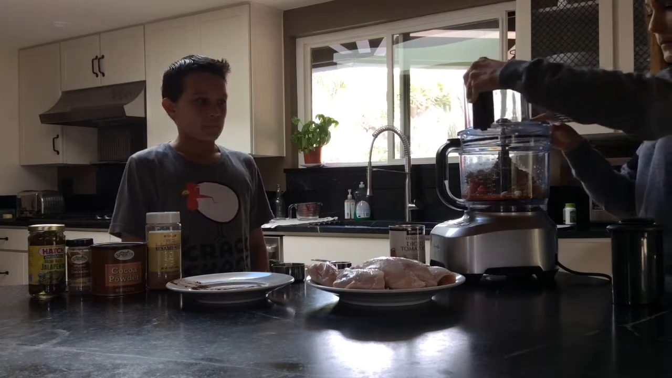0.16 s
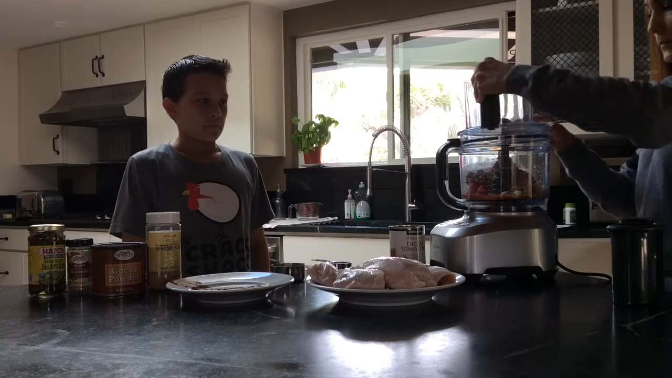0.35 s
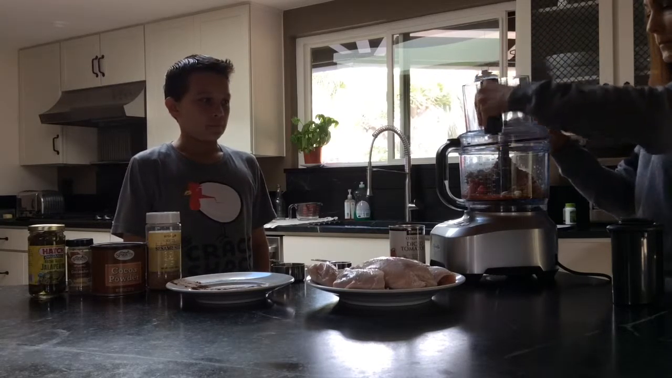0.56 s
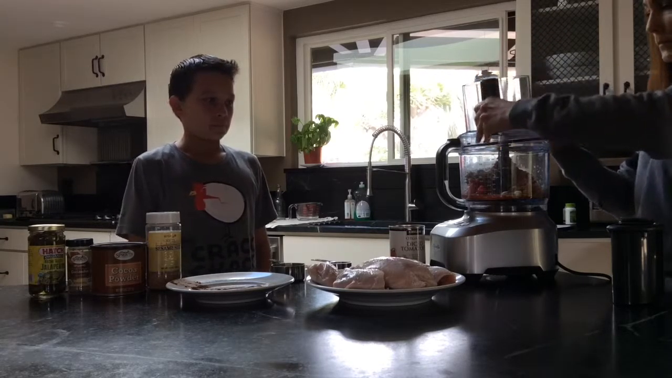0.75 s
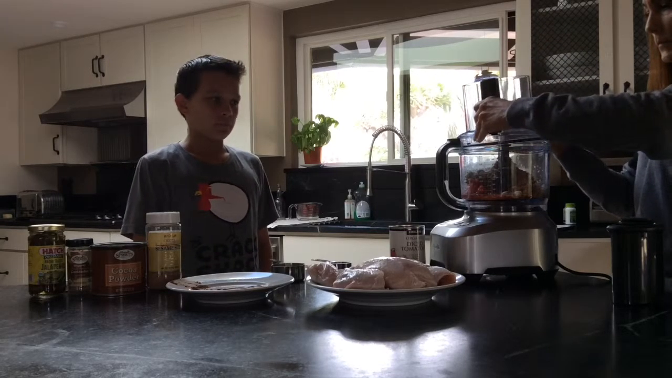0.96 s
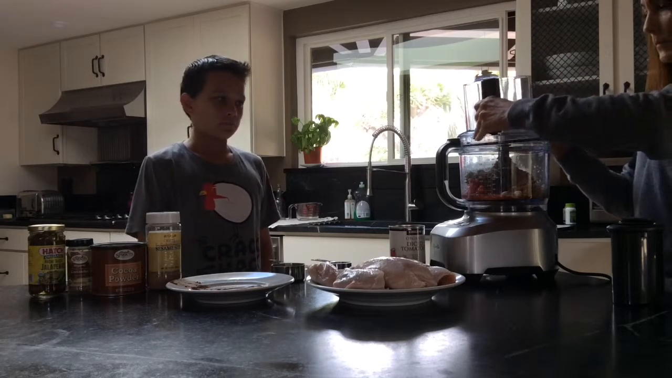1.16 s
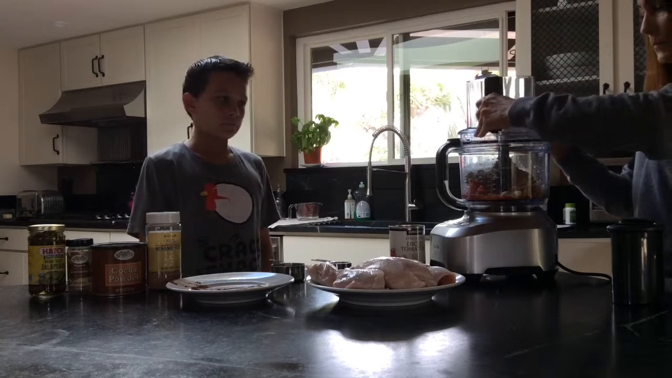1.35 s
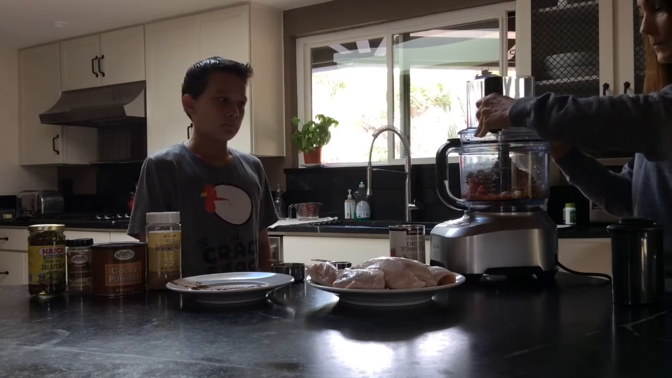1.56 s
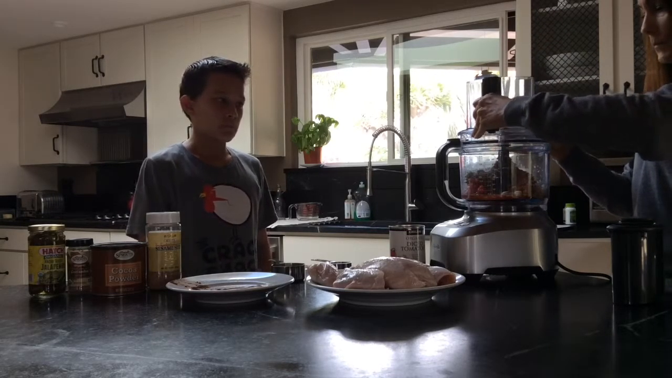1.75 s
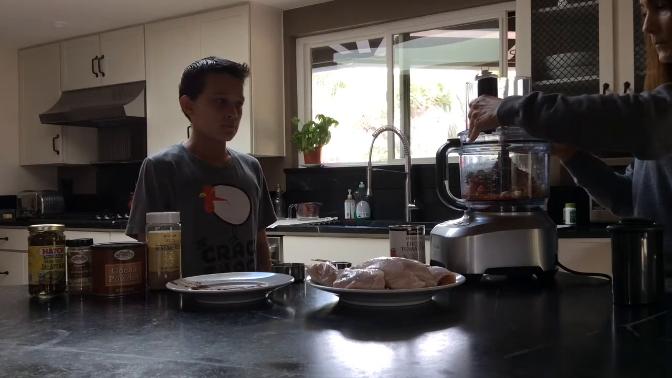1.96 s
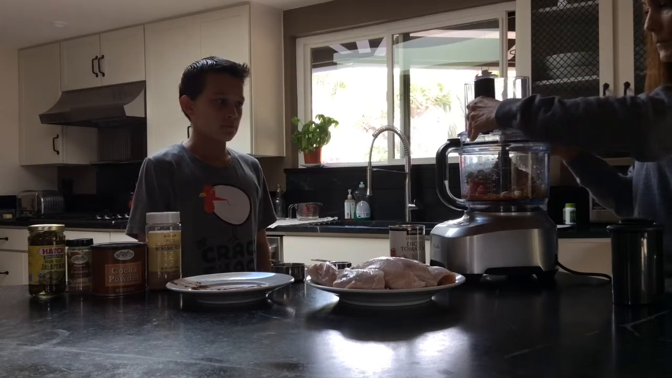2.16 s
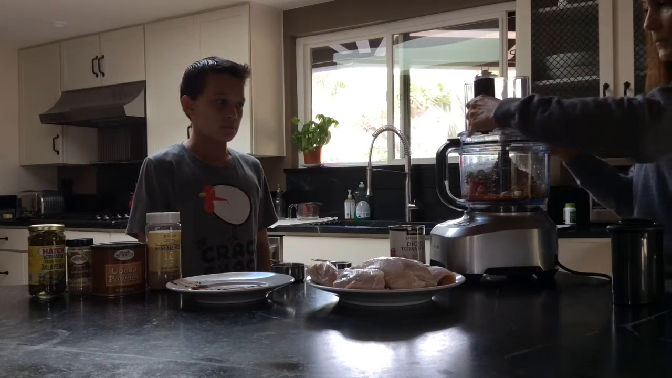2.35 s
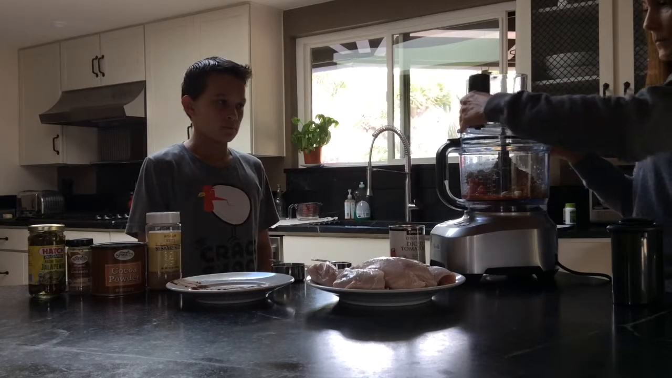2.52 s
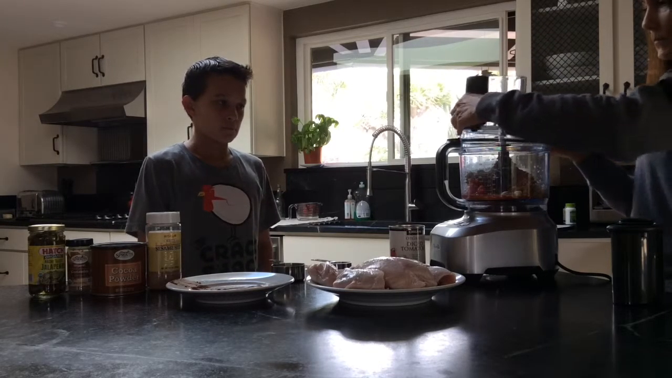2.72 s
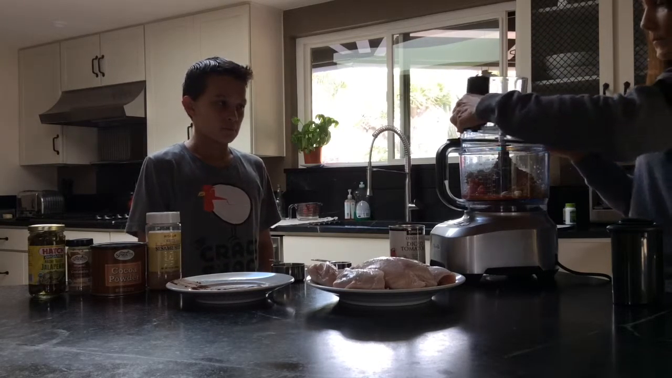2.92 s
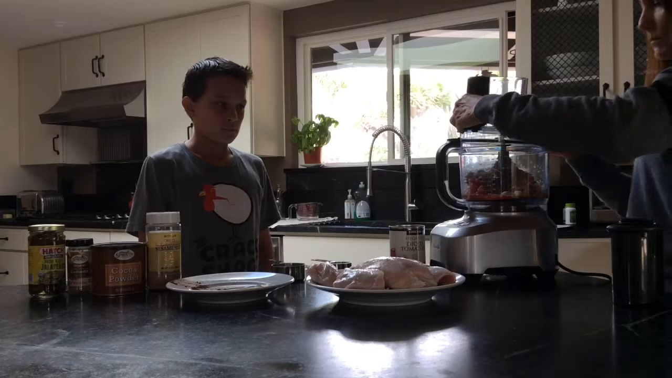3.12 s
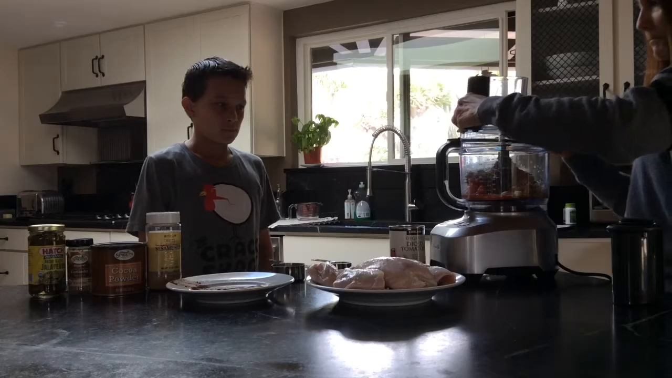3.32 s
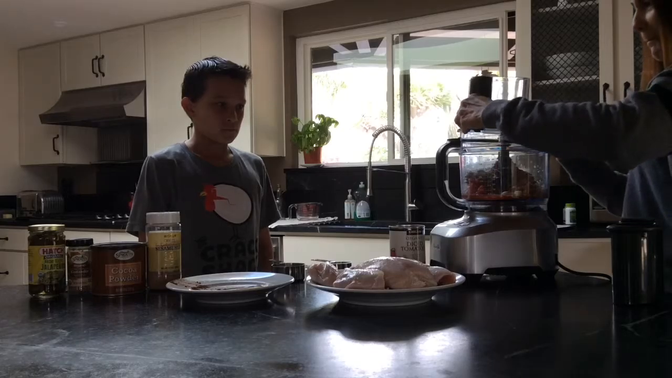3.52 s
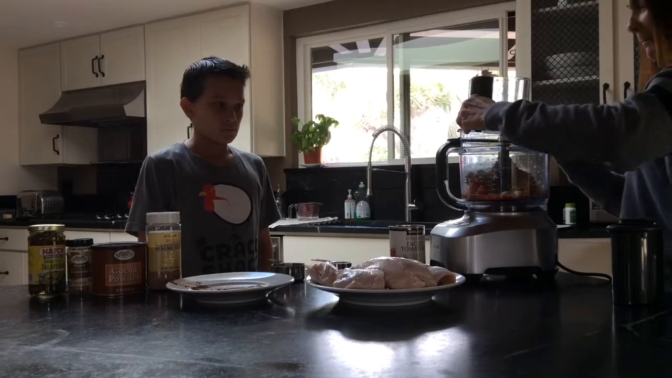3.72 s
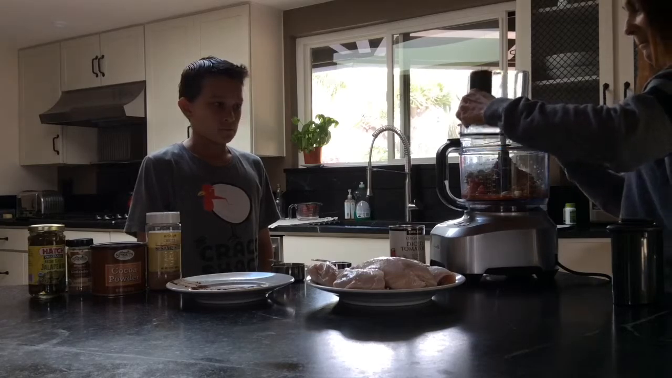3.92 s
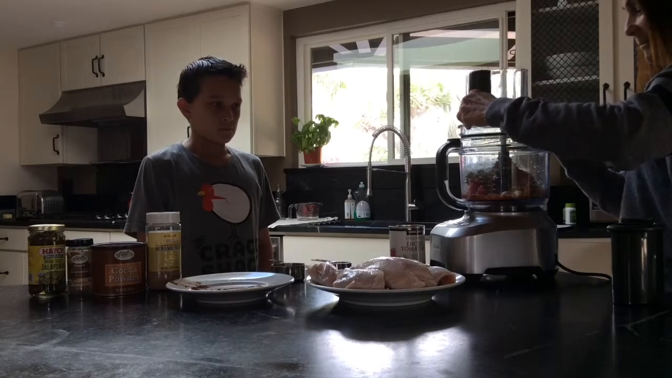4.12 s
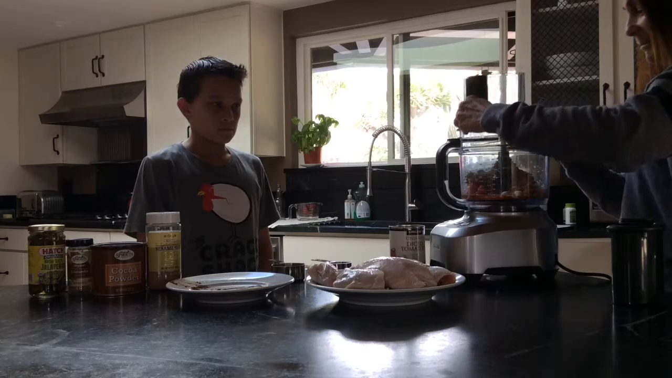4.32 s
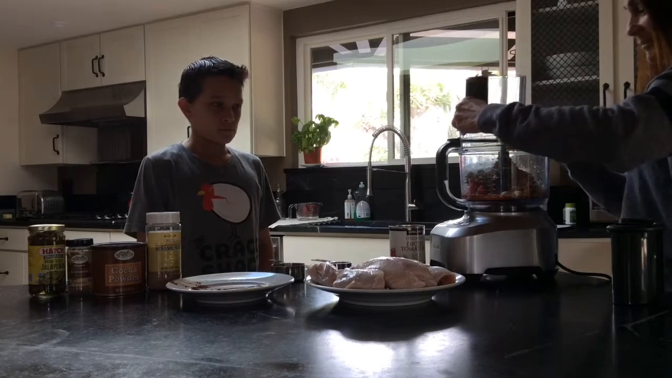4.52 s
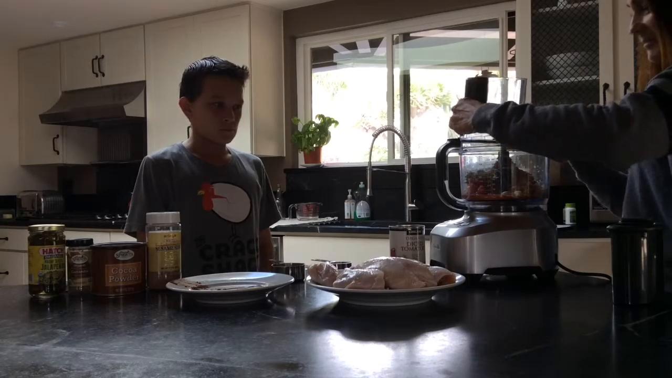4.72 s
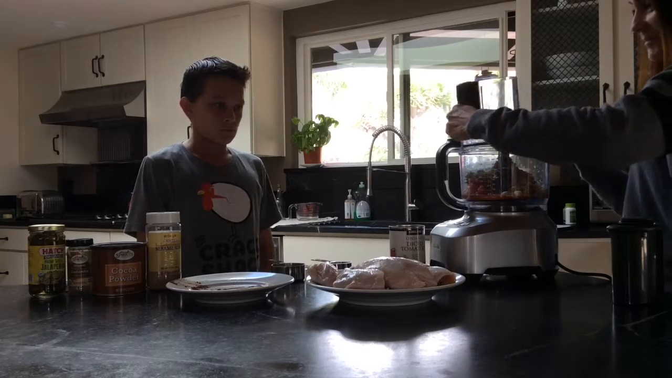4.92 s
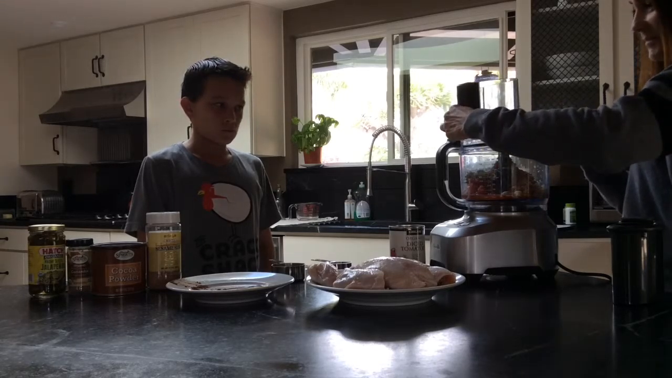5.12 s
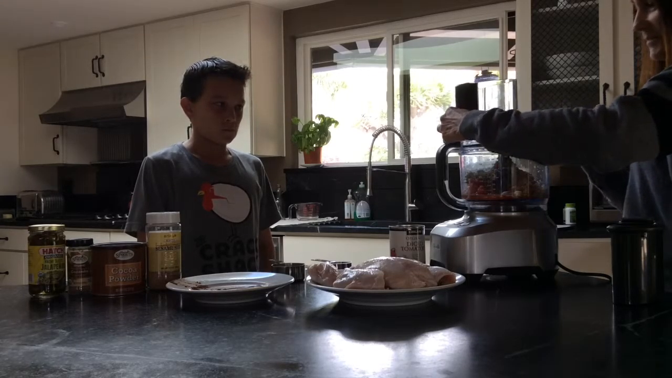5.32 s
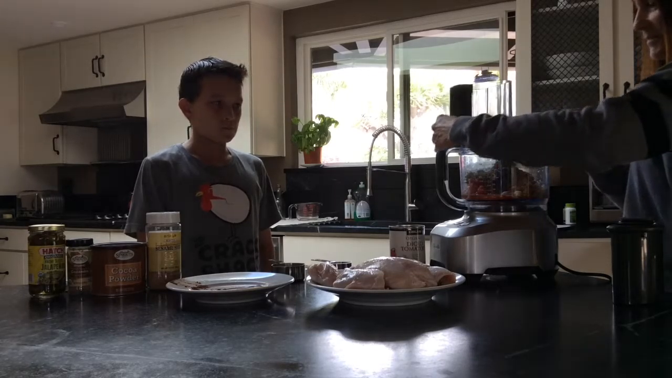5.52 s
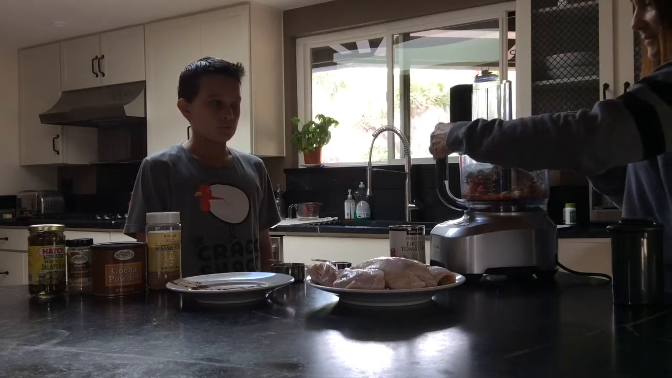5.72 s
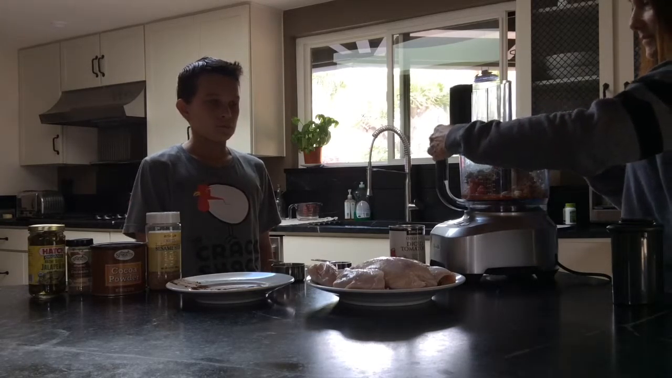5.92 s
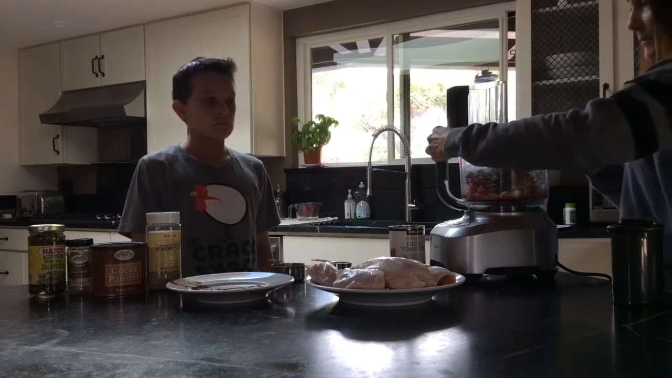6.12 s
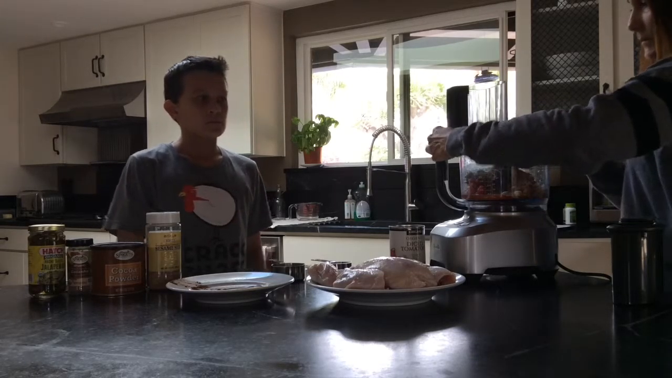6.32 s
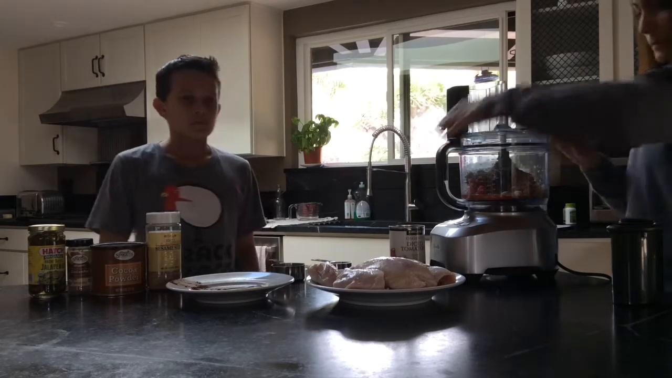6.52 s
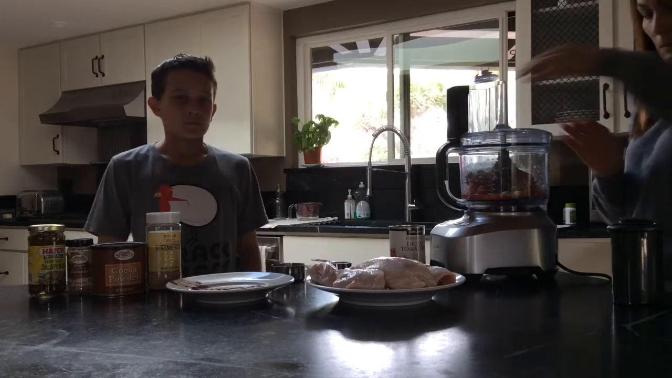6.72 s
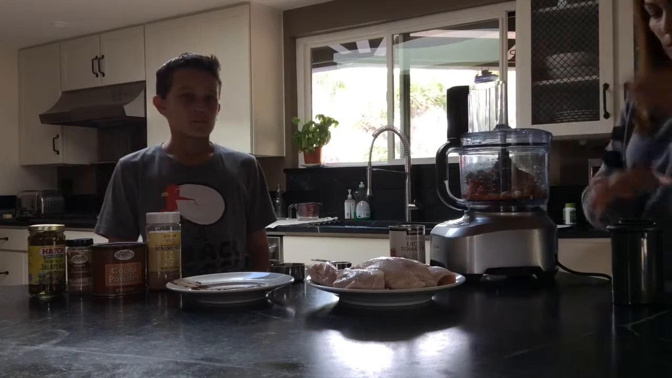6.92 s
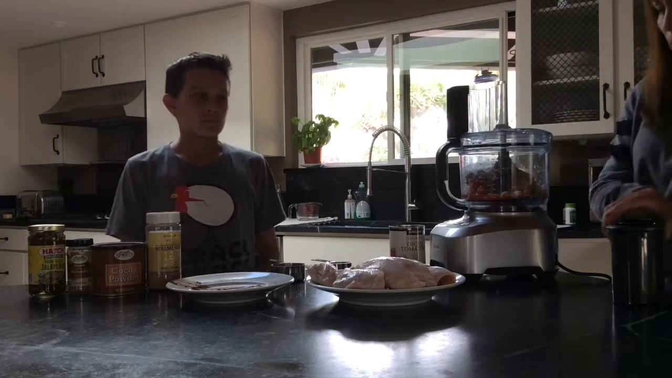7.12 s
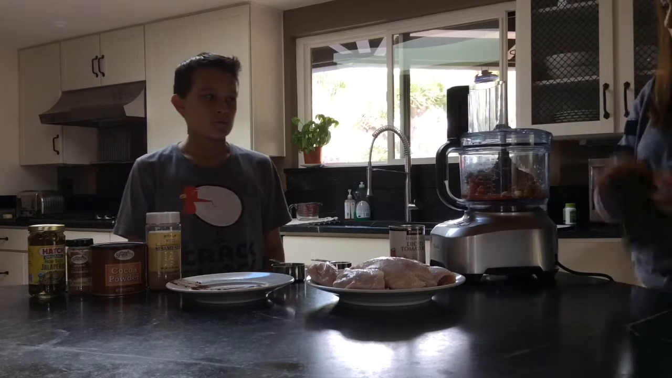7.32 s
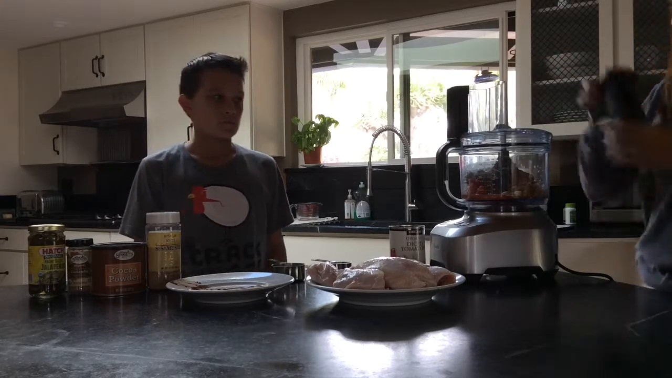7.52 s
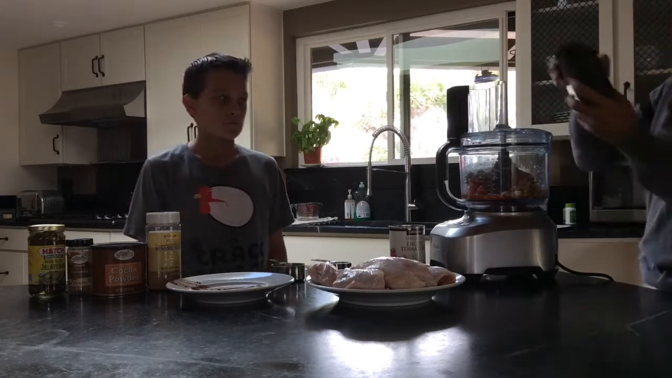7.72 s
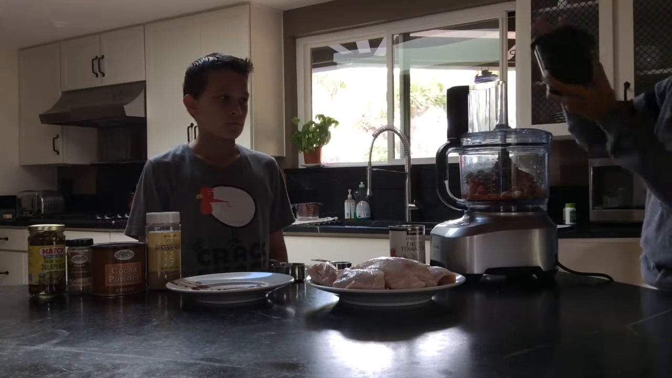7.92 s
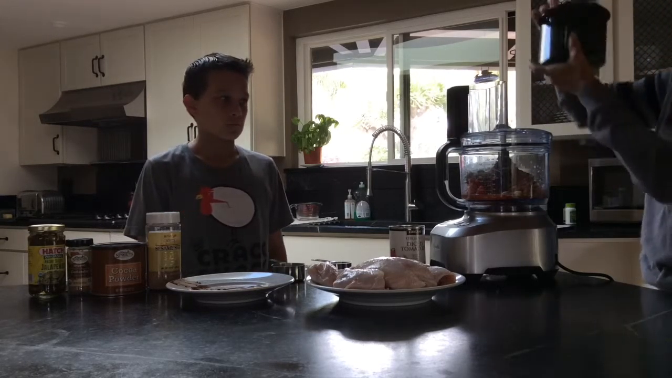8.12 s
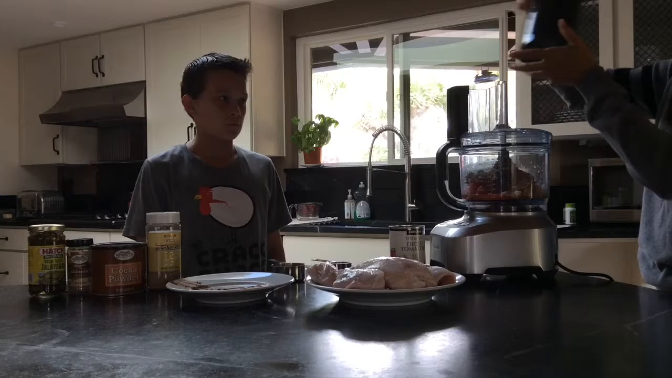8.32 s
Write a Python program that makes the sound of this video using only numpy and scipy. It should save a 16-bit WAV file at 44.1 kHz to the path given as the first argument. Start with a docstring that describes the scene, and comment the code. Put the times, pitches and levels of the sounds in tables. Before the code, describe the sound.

In a quiet kitchen, a food processor's plastic lid is fitted onto its bowl. A sharp clack comes first, then a click with a low thump and scattered light taps. The knocks build into a quick hollow rattle and end in a crisp locking snap. Sleeves rustle faintly and a cup is knocked once. Everything is at arm's length, with a short echo and a low fridge hum.

```python
"""Kitchen counter, at arm's length: a food processor's plastic lid and pusher slide, seat and lock.
Each contact cracks, thumps the air in the bowl and rings the lid's modes; the base thumps once, low.
Then sleeves rustle, and a cup is knocked and lifted.
Cabinets and hard walls echo every click. A fridge hums low over soft room noise."""
import sys
import numpy as np
from scipy import signal
from scipy.fft import rfft, irfft, next_fast_len
from scipy.io import wavfile
from scipy.ndimage import uniform_filter1d

SR = 44100
rng = np.random.default_rng(int(sys.argv[2]) if len(sys.argv) > 2 else 0)


def dump(signal):
    """Clip the signal to [-1, 1] and save it as 16-bit WAV at the path in sys.argv[1]."""
    limited = np.clip(np.atleast_2d(signal).T, -1, 1)
    pcm = np.round(limited * 32767).astype(np.int16)
    wavfile.write(sys.argv[1], SR, pcm)


N = 373086
EVENT_N = 32768
EVENT_TIME_S = np.arange(EVENT_N) / SR

# fridge tones: pitch_hz, level_db
FRIDGE_TONES = [(41.5, -82), (59.1, -69), (80.6, -65), (160.5, -74), (180, -72.5)]
# hum envelope, dips near the end: time_s, gain_db
FRIDGE_ENVELOPE = [(0, 0), (7.1, 0.5), (7.6, -6.5), (8.4, -3)]
# room noise spectrum: freq_hz, relative_db
ROOM_SPECTRUM = [(20, -6), (45, -32.5), (75, -3.5), (100, -3), (120, -3.5), (165, 1), (220, -4.5),
                 (400, -9.5), (780, -16.5), (1000, -21.5), (2800, -27.5), (6800, -29), (8300, -25),
                 (15000, -36.5)]
# kitchen reverb: freq_hz, t60_s
ROOM_DECAY = [(100, 0.64), (300, 0.44), (1200, 0.57), (3500, 0.45), (8000, 0.44), (14000, 0.11)]
# counter and cabinet reflections: delay_s, gain
EARLY_ECHOES = [(.0013, 0.095), (.0045, 0.22), (.0083, 0.48), (0.0118, 0.27), (0.019, 0.35)]
# plastic slides and one low thump of the base (at 1.925 s):
# peak_s, width_s, level_db, centre_hz, bandwidth_oct
SLIDES_AND_BASE_THUMP = [(.032, 0.032, -60.5, 432, 0.55), (.62, 0.011, -60, 472, 3),
                         (1.925, 0.038, -49, 179, 2.5), (2.464, .022, -63, 323, 1.4),
                         (2.692, .018, -51, 294, 1.6), (4.034, 0.022, -69.5, 3160, 2.4),
                         (4.476, 0.0073, -66, 2000, 1.1), (6.19, 0.014, -58, 1060, 2.2)]
# lid and pusher contacts; hardness is treble slope, thump is re level, ring is re a usual hit:
# start_s, level_db, hardness_db_per_oct, thump_db, ring_db, hollow_hz, chatter_t60_s, snap_hz
LID_CONTACTS = [(0.657, -33, .1, 1.5, -2, 299.6, 0.022, 1720), (1.008, -71, -0.5, 9, 1.5, 267, .012, 1660),
                (1.289, -67.5, 0.3, 2, 1, 263, 0.025, 2210), (1.793, -69.5, -2.3, 7, 1, 278, .03, 1590),
                (1.8935, -41, 1.3, -7, -3, 457, 0.028, 1720), (2.491, -60, 1.6, 9, 0, 274, 0.022, 1730),
                (2.708, -59.5, 3, 16, 4.5, 329, 0.023, 1940), (2.722, -50.5, -3.5, 8, -3.5, 282, 0.06, 980),
                (2.911, -69, 3.5, -10, -15, 634, 0.018, 5520), (2.998, -69, 2, 1, -1, 270, .016, 1980),
                (3.235, -71, -1.5, 2.5, -4, 238, 0.027, 750), (3.602, -69.5, -5, 11.5, 9, 272, 0.019, 1200),
                (4.06, -60.5, 4.5, 2.5, 2.5, 355, 0.065, 1250),
                (4.448, -64.5, 1.9, -4, 0, 312, 0.044, 1820),
                (4.482, -46.5, -2.6, 12.5, -3, 316, 0.064, 427), (4.81, -63, -5, 10, 1, 273, 0.066, 770),
                (4.959, -52.5, 2.5, 7, 3, 278, 0.11, 1790),
                (5.0205, -46.5, 2.5, -8.5, 6.5, 270, 0.011, 1190),
                (5.218, -56, -1.5, 1.5, -2.5, 293, .11, 900), (5.25, -69.5, 5.5, 8, -6.5, 330, .03, 860),
                (5.433, -64.5, -3, 9, -4.5, 332, 0.092, 716), (5.511, -52.5, -4, 7, 1.5, 210, 0.045, 830),
                (5.556, -45, -3.5, 4, -2, 223, 0.06, 520), (5.564, -36.5, -0.9, 6.5, 1.5, 226.5, 0.02, 790),
                (5.587, -46, 0.5, 11.5, 2, 229, .079, 1240), (5.612, -41.5, -1.5, 7, 1, 236, 0.075, 1220),
                (6.197, -61, 2, 2, 3, 360, 0.024, 1700), (6.2403, -36.5, 3, -7.5, -2.5, 774, 0.0048, 5930),
                (6.2503, -43.5, -2, -3, 1.5, 362, 0.037, 520)]
# lid, bowl and base ringing in the room: pitch_hz, relative_db, t60_s
LID_RESONANCES = [(90.4, 1.5, 0.9), (239.7, 0.5, 0.69), (276.3, 12, 0.37), (328, 3, 0.53), (582, 2, 0.19),
                  (620, -5.5, 0.1), (782, 7, 0.32), (856, -6.5, 0.65), (978, -1.5, 0.43), (1155, 4, 0.41),
                  (1186, 2.5, 0.49), (1239, -3.5, 0.63), (1255, 2.5, 0.54), (1372, -24, 0.75),
                  (1530, -22, 0.23), (1798, -0.5, 0.2), (2163, 18.5, 0.05), (3140, 1, 0.3), (3460, 5, 0.31),
                  (4760, 18, 0.097), (5840, -20, 0.39), (5500, 2, .24), (7900, 7.5, 0.4), (7890, 2.5, 0.31)]
# usual lid hit in the knock, clack, click and tick bands: offset_db
LID_BANDS_DB = [2.1, 0.5, -5, -14]
# bounds of the thud, knock, clack, click and tick bands: edge_hz
BAND_EDGES_HZ = [150, 400, 1000, 2400, 6500, 15000]
# shell colour, on all contacts: freq_hz, relative_db
SHELL_SPECTRUM = [(40, -29), (90, -6), (170, -6.5), (290, -0.5), (420, 2.5), (750, -1), (1050, -1.5),
                  (1400, -6.5), (1750, -1), (2500, -2), (3400, 6.5), (4200, 4), (5600, 0.5), (8800, -8.5),
                  (15000, -26)]
# sleeve strokes: peak_s, level_db
SLEEVE_STROKES = [(6.72, -77), (7.58, -67), (7.753, -68), (7.868, -67), (8.259, -70), (8.353, -65.5)]
# cup contacts: columns as LID_CONTACTS
CUP_CONTACTS = [(7.3558, -47, 0, -11.5, 2, 618, 0.0075, 1970), (7.61, -72.5, -5, -1, -2, 477, 0.034, 720),
                (8.186, -66.5, -3, -7, 2.5, 480, 0.029, 676)]
# cup modes: pitch_hz, relative_db, t60_s
CUP_RESONANCES = [(440, 2, 0.93), (610, 4, 0.29), (820, 8, 0.2), (890, -8, 0.2), (1236, 1, 0.17),
                  (1880, -1, 0.25), (3820, 5, 0.35), (4180, -3, 0.72), (4640, -14, .35)]
# usual cup hit, bands as LID_BANDS_DB: offset_db
CUP_BANDS_DB = [7, -0.5, -1.5, -3.5]


def undb(db):
    """Decibels to gain."""
    return 10 ** (np.asarray(db) / 20)


def unit(x):
    """Scale to unit energy."""
    return x / np.sqrt(np.sum(x ** 2))


def decay(t60_s):
    """Exponential envelope, -60 dB at t60_s."""
    return np.exp(-np.log(1000) * EVENT_TIME_S / max(t60_s, 1 / SR))


def add(out, start_s, x):
    """Mix x into out at start_s."""
    i = int(start_s * SR)
    x = x[max(-i, 0):len(out) - i]
    out[max(i, 0):max(i, 0) + len(x)] += x


def colour(x, points):
    """Minimum-phase filter through (freq_hz, gain_db) points."""
    hz, db = np.transpose(points)
    n = 2 * next_fast_len(len(x) // 2 + 2048)
    bin_hz = np.maximum(np.arange(n // 2 + 1) * SR / n, 1)
    gain = undb(np.interp(np.log(bin_hz), np.log(hz), db))
    cepstrum = irfft(np.log(gain))
    cepstrum[1:n // 2] *= 2
    cepstrum[n // 2 + 1:] = 0
    return irfft(rfft(x, n) * np.exp(rfft(cepstrum)))[:len(x)]


def wander(rate_hz):
    """Smooth random curve, spread near 1."""
    step = int(SR / rate_hz)
    return uniform_filter1d(np.repeat(rng.standard_normal(N // step + 1), step), step)[:N]


def fridge_hum(waver_db=1, drift_rad=0.16):
    """Low tones, wavering slightly in level and phase."""
    time_s = np.arange(N) / SR
    hum = np.zeros(N)
    for hz, level_db in FRIDGE_TONES:
        amplitude = np.sqrt(2) * undb(level_db + waver_db * wander(rate_hz=6.7))
        phase = 2 * np.pi * (hz * time_s + rng.random()) + drift_rad * wander(rate_hz=3.2)
        hum += amplitude * np.sin(phase)
    return hum * undb(np.interp(time_s, *np.transpose(FRIDGE_ENVELOPE)))


def room_noise(rms_db=-65.5):
    """Still kitchen: steady low noise and faint hiss."""
    return undb(rms_db) * np.sqrt(N) * unit(colour(rng.standard_normal(N), ROOM_SPECTRUM))


def room_tail(build_s, ripple=1):
    """Diffuse impulse response: builds up, then decays, top treble first."""
    hz, t60_s = np.transpose(ROOM_DECAY)
    spectrum = rfft(rng.standard_normal(EVENT_N)) * ripple
    bin_hz = np.arange(len(spectrum)) * SR / EVENT_N
    bin_octave = np.log2(np.clip(bin_hz, 128, 16384))
    tail = np.zeros(EVENT_N)
    for octave in range(7, 15):
        share = np.maximum(1 - np.abs(bin_octave - octave), 0)
        tail += irfft(spectrum * share) * decay(np.interp(octave, np.log2(hz), t60_s))
    return unit(tail * (1 - np.exp(-EVENT_TIME_S / build_s)))


def grain(grain_db=3):
    """Spiky random gain per sample."""
    return undb(grain_db * rng.exponential(size=EVENT_N))


def noise_swells(strokes, wet_db=-2):
    """One swell of band-passed grains per row: a slide, a rustle or the base's low thump."""
    out = np.zeros(N)
    tail = room_tail(build_s=0.0035)
    for peak_s, width_s, level_db, centre_hz, bandwidth_oct in strokes:
        grains = rng.standard_normal(EVENT_N) * grain()
        swell = grains * np.exp(-(EVENT_TIME_S / width_s - 2) ** 2)
        swell += undb(wet_db) * signal.fftconvolve(swell, tail)[:EVENT_N]
        edge_ratio = 2 ** (bandwidth_oct / 2)
        band_hz = [centre_hz / edge_ratio, centre_hz * edge_ratio]
        swell = signal.sosfilt(signal.butter(2, band_hz, "band", fs=SR, output="sos"), swell)
        add(out, peak_s - 2 * width_s, undb(level_db) * unit(swell) * np.sqrt(2 * width_s * SR))
    return out


def shell_ripple(depth_db=2, width_bins=32):
    """Many weak overlapping shell resonances, as gain per bin."""
    bumps = uniform_filter1d(rng.standard_normal(EVENT_N // 2 + 1), width_bins)
    return undb(depth_db * bumps / bumps.std())


def crack(rise, chatter_t60_s, burst_t60_s=0.012, burst_db=2):
    """Edges catch in tiny uneven slips: a short burst plus chatter."""
    burst, chatter = rng.standard_normal((2, EVENT_N)) * grain() * rise
    return unit(undb(burst_db) * unit(burst * decay(burst_t60_s)) + unit(chatter * decay(chatter_t60_s)))


def ping(hz, t60_s):
    """One damped resonance, unit energy."""
    return unit(np.sin(2 * np.pi * hz * EVENT_TIME_S) * decay(t60_s))


def air_thump(hz, t60_s, rise, tail, wet_db=-8):
    """Enclosed air resonates and excites the room."""
    thump = ping(hz, t60_s) * rise
    return thump + undb(wet_db) * unit(signal.fftconvolve(thump, tail)[:EVENT_N])


def body_ring(modes, mode_waves, snap_hz, rise, fall_db_per_oct=5, scatter_db=2):
    """Modes near the struck spot's pitch ring most; close pairs beat."""
    distance_oct = np.abs(np.log2(np.array(modes)[:, 0] / snap_hz))
    gains = undb(scatter_db * rng.standard_normal(len(modes)) - fall_db_per_oct * distance_oct)
    phasors = np.exp(2j * np.pi * rng.random(len(modes)))
    return unit(((gains * phasors) @ mode_waves).imag * rise ** 2)


def echoed(x):
    """Direct sound plus early reflections."""
    return x + sum(gain * np.pad(x, (int(delay_s * SR), 0))[:len(x)] for delay_s, gain in EARLY_ECHOES)


def band_levels(level_db, hardness_db_per_oct, thump_db, ring_db, bands_db):
    """Five levels in dB: thump sets the thud, hardness tilts the rest, ring lifts the clack."""
    octave = np.log2(BAND_EDGES_HZ[1:-1]) / 2 + np.log2(BAND_EDGES_HZ[2:]) / 2
    upper_db = np.array(bands_db) + hardness_db_per_oct * (octave - octave[1])
    upper_db[1] += ring_db
    return level_db + np.append(thump_db, upper_db)


def shell_voice(x, levels_db):
    """Shell colour, then EQ that brings the first 30 ms toward the five band levels."""
    edges_hz = np.array(BAND_EDGES_HZ)
    centres_hz = np.sqrt(edges_hz[1:] * edges_hz[:-1])
    head_n = int(0.03 * SR)
    x = colour(x, SHELL_SPECTRUM)
    for _ in range(2):
        power_per_hz = 2 * np.abs(rfft(x[:head_n], SR)) ** 2 / (SR * head_n)
        current_db = 10 * np.log10(np.add.reduceat(power_per_hz, edges_hz)[:-1])
        x = colour(x, np.column_stack([centres_hz, levels_db - current_db]))
    return x


def contacts(hits, modes, bands_db, softness, snap_db, hollow_t60_s, ring_mix_db, wet_db):
    """Crack, snap of the struck spot, air thump, ring and reverb per hit. Mix gains are pre-EQ."""
    out = np.zeros(N)
    mode_waves = np.array([undb(db) * decay(t60_s) * np.exp(2j * np.pi * hz * EVENT_TIME_S)
                           for hz, db, t60_s in modes])
    ripple = shell_ripple()
    for start_s, level_db, hardness, thump_db, ring_db, hollow_hz, chatter_t60_s, snap_hz in hits:
        # slow seating: long chatter, soft onset
        rise = 1 - np.exp(-EVENT_TIME_S / (softness * chatter_t60_s))
        snap = undb(snap_db) * ping(snap_hz, t60_s=0.024) * rise
        click = crack(rise, chatter_t60_s) + snap
        tail = room_tail(build_s=0.027 * chatter_t60_s, ripple=ripple)
        hollow_db = -9 + 0.88 * thump_db  # heavier thump, more pitched air
        thump = undb(hollow_db) * air_thump(hollow_hz, hollow_t60_s, rise, tail)
        ring = undb(ring_mix_db + ring_db) * body_ring(modes, mode_waves, snap_hz, rise)
        hit = echoed(click) + undb(wet_db) * tail + thump + ring
        levels_db = band_levels(level_db, hardness, thump_db, ring_db, bands_db)
        add(out, start_s, shell_voice(hit, levels_db))
    return out


def lid_clicks():
    """Lid and pusher strike, seat and lock on the bowl."""
    return contacts(LID_CONTACTS, LID_RESONANCES, LID_BANDS_DB,
                    softness=0.049, snap_db=-7, hollow_t60_s=0.097, ring_mix_db=-8, wet_db=-1)


def sleeve_rustle(width_s=0.023, centre_hz=5200, bandwidth_oct=2.65):
    """Cloth brushes as the arm moves."""
    return noise_swells([(peak_s, width_s, db, centre_hz, bandwidth_oct)
                         for peak_s, db in SLEEVE_STROKES])


def cup_knocks():
    """Cup knocked and lifted: drier than the lid, less ring."""
    return contacts(CUP_CONTACTS, CUP_RESONANCES, CUP_BANDS_DB,
                    softness=0.083, snap_db=-14, hollow_t60_s=0.093, ring_mix_db=-19, wet_db=-6.5)


def scene():
    """Mono mix of food processor, cup, sleeves, fridge and room."""
    processor = lid_clicks() + noise_swells(SLIDES_AND_BASE_THUMP)
    return (processor + cup_knocks() + sleeve_rustle() + fridge_hum() + room_noise())[None]


def record(dry):
    """Steep low-pass at 15.4 kHz."""
    return signal.sosfilt(signal.ellip(10, 0.2, 70, 15400, fs=SR, output="sos"), dry)


dry = scene()
out = record(dry)
dump(out)
```